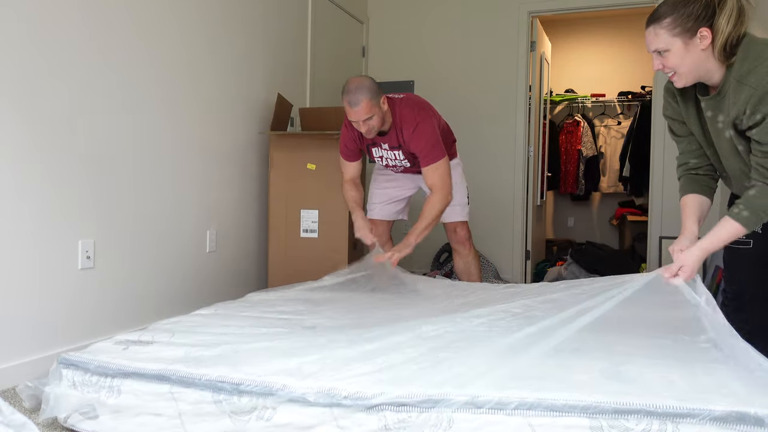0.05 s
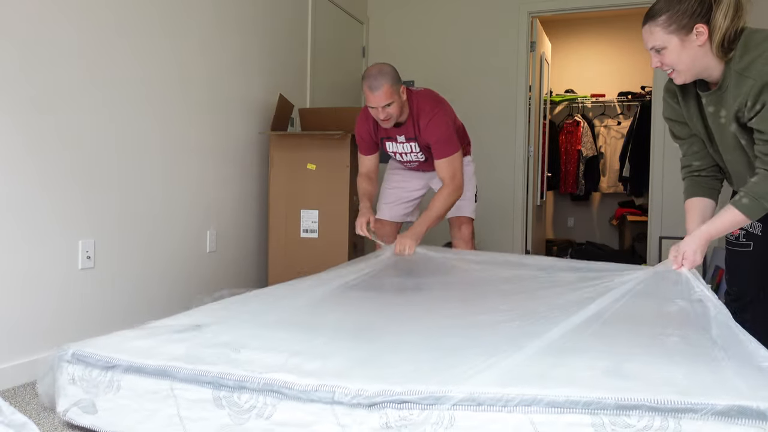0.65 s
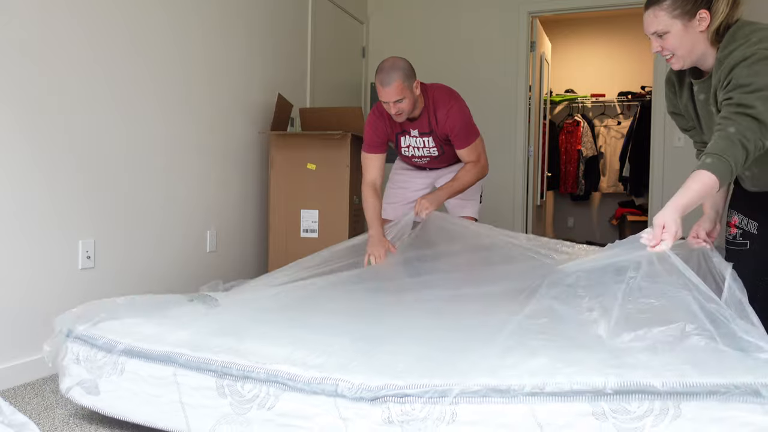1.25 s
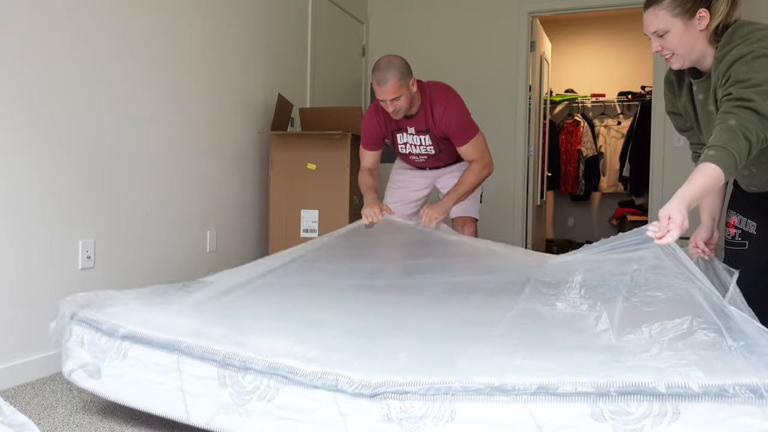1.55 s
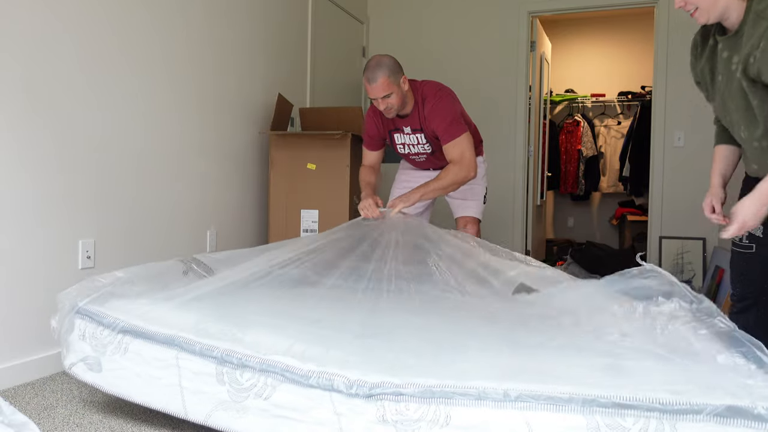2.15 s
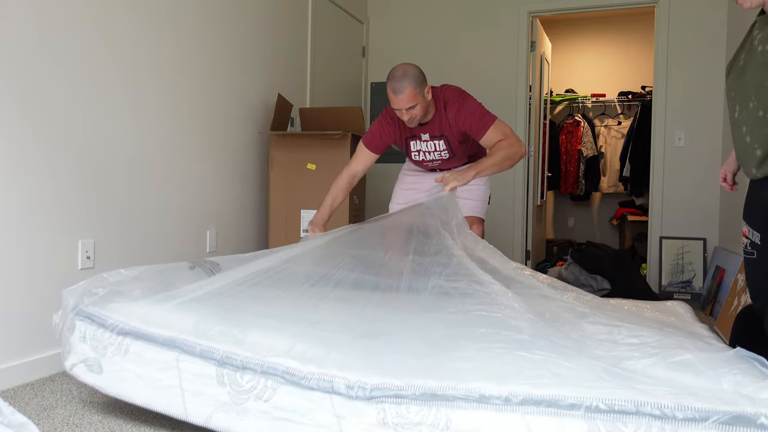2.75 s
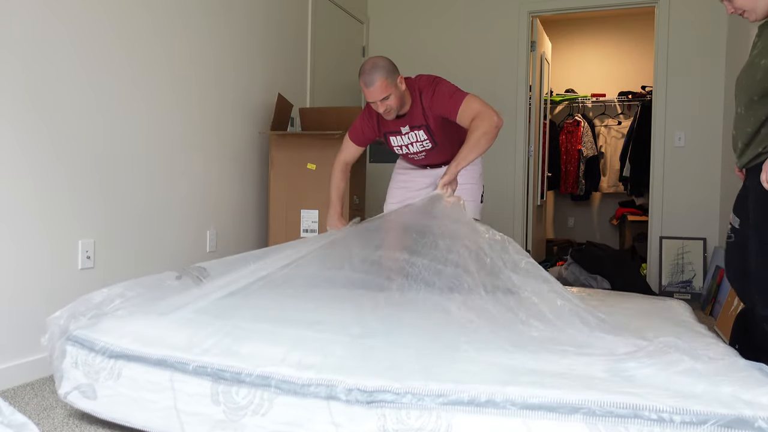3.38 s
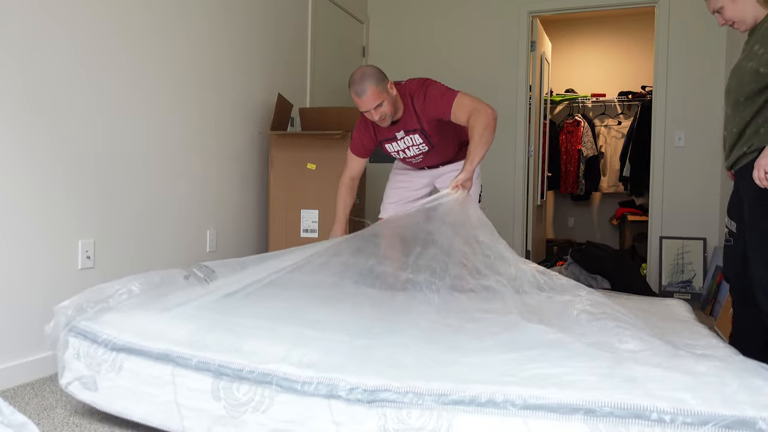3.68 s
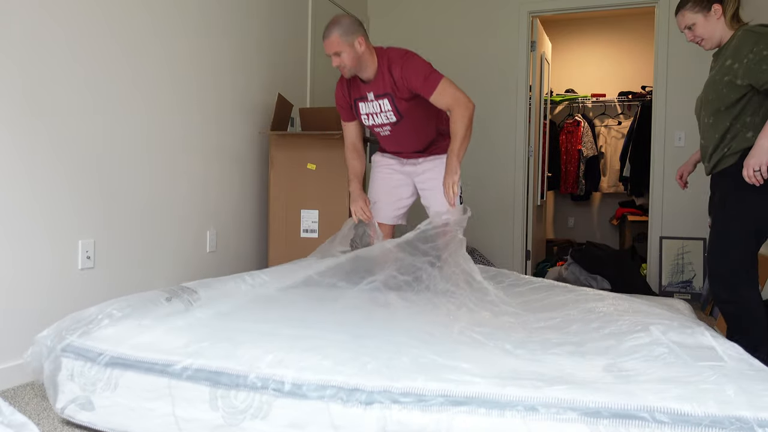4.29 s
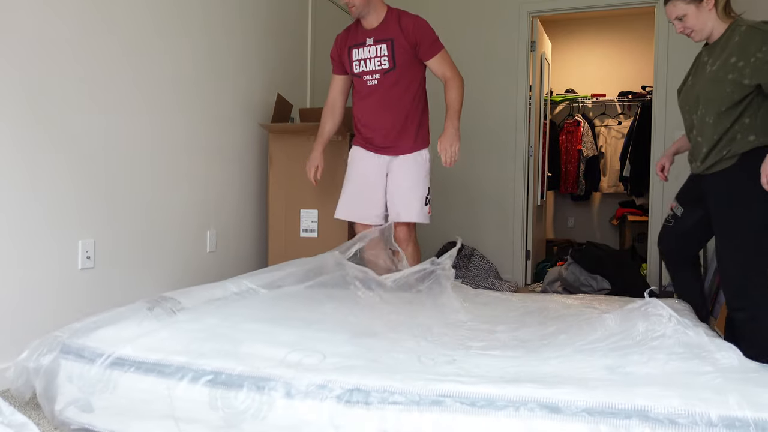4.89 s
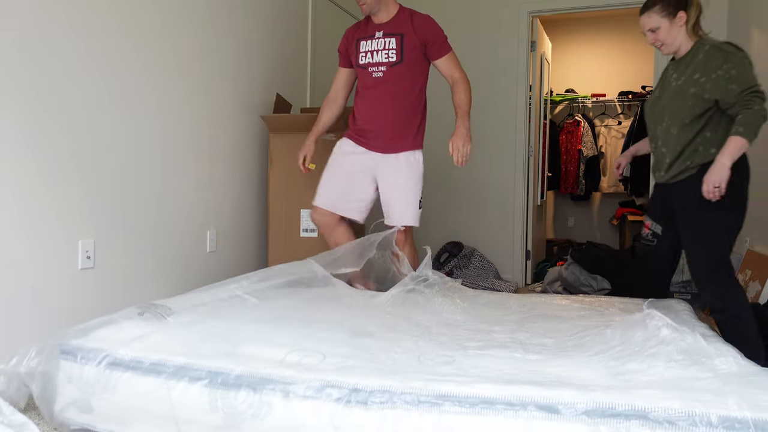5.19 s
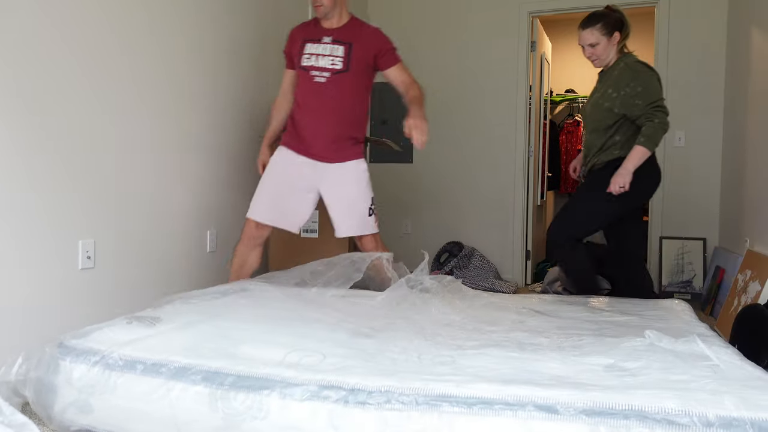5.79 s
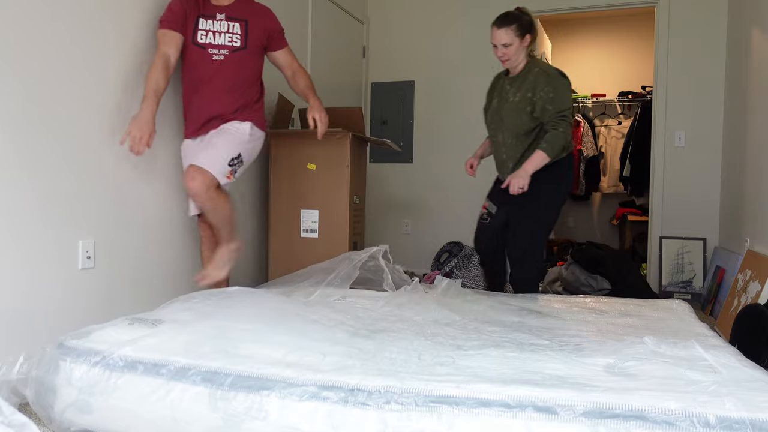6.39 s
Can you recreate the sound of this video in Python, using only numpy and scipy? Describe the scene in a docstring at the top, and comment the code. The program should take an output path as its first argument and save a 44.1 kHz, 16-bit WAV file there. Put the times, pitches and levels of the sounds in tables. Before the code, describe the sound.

Plastic film is tugged off a mattress, crackling and flapping in surges, then settling into lighter rustles and scattered snaps.

```python
"""In a small bedroom, two people pull thin plastic wrapping off a mattress.
With each pull the film speeds up and coasts to rest. Countless creases buckle as it moves, over the
hiss of film sliding on fabric, and wide slack panels rumble. Tugs make the sheet flap taut with a
burst of crackle, billowing panels give soft whumps, and single creases snap as it settles.
One soft footfall thumps near the end. The walls add a short echo, and the room has a faint hush."""
import sys
import numpy as np
from scipy import signal
from scipy.fft import rfft, irfft
from scipy.io import wavfile
from scipy.ndimage import uniform_filter1d

SR = 44100
rng = np.random.default_rng(int(sys.argv[2]) if len(sys.argv) > 2 else 0)


def dump(signal):
    """Clip the signal to [-1, 1] and save it as 16-bit WAV at the path in sys.argv[1]."""
    limited = np.clip(np.atleast_2d(signal).T, -1, 1)
    pcm = np.round(limited * 32767).astype(np.int16)
    wavfile.write(sys.argv[1], SR, pcm)


N = 284004
TIME = np.arange(N) / SR

# Each pull speeds up, holds and coasts to rest. More crispness means more treble.
# start_s, rise_s, hold_s, fade_db_per_s, level_db, crispness, rumble_vs_rustle_db
FILM_PULLS = [(0.108, 0.029, 0.028, 27, -25, -13, -20), (0.245, 0.12, 0.38, 11, -23, -10, -7.5),
              (0.908, 0.045, 0.031, 240, -26, -16, -6), (1.094, 0.0099, 0.054, 90, -23.5, -11.5, -4),
              (1.265, 0.012, 0.03, 65, -29.5, -9.5, -4.5), (1.425, 0.01, 0.092, 41, -25.5, -11, -8),
              (1.71, 0.016, 0.13, 39, -29, -12.5, -7), (1.909, 0.056, 0.055, 180, -23.5, -14.5, -23),
              (2.21, 0.19, 0.023, 69, -24.5, -13, -7.5), (2.53, 0.011, 0.27, 71, -29.5, -12, -23),
              (2.885, 0.016, 0.32, 55, -29.5, -13, -12), (3.10, 0.27, 0.16, 43, -22.5, -11, -10.5),
              (3.80, 0.11, 0.14, 67, -26.5, -12, -13.5), (4.129, 0.011, 0.035, 37, -28, -12.5, -19),
              (4.649, 0.035, 0.031, 104, -30.5, -12, -8), (4.93, 0.031, 0.02, 200, -36.3, -11.5, -11),
              (5.18, 0.038, 0.028, 240, -36.5, -11, -7), (5.697, 0.094, 0.026, 62, -25, -11, -9),
              (6.019, 0.029, 0.029, 143, -31, -10.5, -16)]
# The film keeps stirring between pulls, less once it is let go: time_s, level_db
FILM_STIRRING = [(0, -32.5), (0.1, -34), (1.0, -37), (2.15, -31.5), (3.0, -34.5), (4.5, -40), (5.1, -38.5),
                 (5.45, -43.5), (5.65, -46), (6.44, -47)]
# The sheet is jerked taut; the soft thump at 4.95 s is a footfall.
# start_s, thump_db, slap_db, crackle_db, fade_s
TUGS_AND_FOOTFALL = [(0.015, -37.5, -43.5, -55, 0.12), (0.115, -30, -24.5, -36, 0.025),
                     (0.199, -24.5, -22, -48, 0.035), (0.289, -43.5, -39, -20.5, 0.025),
                     (0.379, -40, -40, -30, 0.021), (0.661, -35, -43.5, -22, 0.05),
                     (0.921, -36, -26, -21.5, 0.056), (0.978, -31, -36, -23, 0.039),
                     (1.096, -28, -25, -26, .014), (1.15, -31, -29, -35, 0.062),
                     (1.276, -43, -32, -21, 0.018), (1.282, -30.5, -26, -34, 0.013),
                     (1.315, -32.5, -38, -23, 0.019), (1.435, -37, -29, -27, 0.034),
                     (1.568, -32.5, -30, -44, 0.027), (1.935, -30.5, -25.5, -35.5, 0.023),
                     (1.957, -28.5, -27.5, -31, 0.043), (2.431, -28, -33.5, -22, 0.011),
                     (2.547, -31, -34, -33, 0.018), (2.6, -34, -45, -36, 0.012),
                     (2.635, -40, -45, -26, 0.022), (2.76, -49, -46, -27, 0.02),
                     (2.814, -37, -48, -26, 0.019), (3.278, -50, -51, -24, 0.046),
                     (3.491, -38, -30.5, -27, 0.035), (4.95, -41.5, -47, -42, 0.063),
                     (5.759, -43, -36.5, -41, 0.11), (6.058, -42, -39.5, -30.5, 0.045)]
# Single creases snap through: start_s, level_db, pitch_hz
CREASE_SNAPS = [(0.1132, -16, 4030), (0.121, -15.5, 1200), (0.134, -15, 4000), (0.1985, -20, 2200),
                (0.296, -21, 8000), (0.914, -12, 3500), (1.0973, -8, 1700), (1.267, -18, 7400),
                (1.274, -15, 9000), (1.278, -15, 2570), (1.399, -21, 7500), (1.9325, -12, 1050),
                (1.954, -12.5, 1800), (2.5535, -19, 8000), (2.5559, -15, 520), (2.825, -18, 3300),
                (3.826, -20, 4500), (4.1465, -18, 3480), (4.438, -35, 7600), (4.549, -33, 2800),
                (5.1227, -28, 4500), (5.229, -27, 7000), (5.262, -22, 3500), (5.3306, -28, 4230),
                (5.566, -35, 6900), (5.5735, -28, 8500), (5.668, -39, 8000), (6.157, -22, 3000),
                (6.182, -24.5, 2800), (6.284, -28.5, 1380), (6.328, -34, 4000), (6.348, -29.5, 4200),
                (6.384, -25.5, 4260)]
# A wide panel billows and the air under it booms: start_s, level_db, pitch_hz, fade_s
PANEL_WHUMPS = [(0.025, -35, 90, .03), (0.113, -46, 58, .02), (0.2, -27, 208, .014),
                (0.96, -46, 58.3, .035), (0.995, -28, 282, .014), (1.275, -43, 56, .04),
                (1.285, -30, 290, .016), (1.947, -27, 120, .018), (1.972, -27, 270, .016),
                (2.546, -22, 235, 0.0092), (2.562, -26, 128, .019), (2.645, -36, 121, 0.024),
                (3.115, -43, 115, .02), (3.3, -42, 85, .04)]

# The tone of each sound, from bass to treble: frequency_hz, level_db
CREASE_TONE = [(150, -23), (400, -8), (700, -6.5), (1000, -6.5), (1300, -3.5), (2200, -2.5), (3600, -2),
               (5000, -4), (6500, -7), (8000, -10), (11000, -16.5), (16000, -26)]  # small creases rustling
PANEL_TONE = [(25, -40), (45, -41), (70, -15), (110, -5), (200, -0.5), (290, 2.5), (370, -4), (500, -3),
              (850, -2.5), (1500, -16.5), (4000, -57)]  # wide panels rumbling
THUMP_TONE = [(30, -42), (60, -41), (110, -11), (185, 1.5), (285, 7), (400, -18), (700, -17.5), (2000, -44)]  # the low thump of a tug or footfall
SLAP_TONE = [(100, -34), (250, -0.5), (480, 4.5), (850, 3), (1700, -6.5), (2600, -14), (8000, -35)]  # the brighter slap that comes with it
HUSH_TONE = [(20, -20), (60, -19), (130, -15), (300, 5), (1000, -4), (4000, -10), (15000, -29)]  # still air in the room
# How long the room's echo takes to fade by 60 dB: frequency_hz, fade_s
ECHO_TIMES = [(100, 0.34), (500, 0.55), (2000, 0.35), (6000, 0.29), (14000, 0.22)]
# How far the sound spreads to left and right: frequency_hz, width_db
STEREO_WIDTH = [(60, -49), (220, -34), (380, -16.5), (650, -14.5), (900, -9.5), (2800, -8.5), (5500, -7.5),
                (10000, -4), (15000, -14.5)]


def film_motion(dulling_per_s=3, stir_crispness=-12.5, stir_rumble_db=-8):
    """Pulls and stirring add up; gives the rustle level, crispness and rumble level over time."""
    stir_db = np.interp(TIME, *np.transpose(FILM_STIRRING))
    power = from_db(stir_db) ** 2
    crisp_sum = power * stir_crispness
    rumble = power * from_db(stir_rumble_db) ** 2
    for start_s, rise_s, hold_s, fade_db_per_s, level_db, crispness, rumble_db in FILM_PULLS:
        age = np.maximum(TIME - start_s, 0)
        coasting_s = np.maximum(age - rise_s - hold_s, 0)
        speed = np.minimum(age / rise_s, 1) * from_db(-fade_db_per_s * coasting_s)
        pull = (speed * from_db(level_db)) ** 2
        power += pull
        # the tight creases go first, so a pull grows duller as it lasts
        crisp_sum += pull * (crispness - dulling_per_s * age)
        rumble += pull * from_db(rumble_db) ** 2
    return 10 * np.log10(power), crisp_sum / power, 10 * np.log10(rumble)


def crease_rustle(level_db, crispness, slide_db=-4, tick_db=-14, gain_db=1.32):
    """Faster motion buckles more creases; each has its own size and so its own pitch range."""
    rate = 4200 * from_db(0.42 * (level_db - level_db.max()))
    edges_hz = np.geomspace(500, 15000, 6)
    creases = random_clicks(rate, spread_db=2.5)
    for band in zip(edges_hz, edges_hz[1:]):
        creases += butter(random_clicks(rate / 2, spread_db=1), band, "band", order=1)
    # the sharpest kinks give sparse, very high ticks
    ticks = from_db(tick_db) * rms_one(butter(random_clicks(rate / 20, spread_db=5), 8000, "high"))
    clumps = rms_one(creases) * from_db(0.96 * drift(90))
    sliding_hiss = from_db(slide_db) * rng.standard_normal(N)
    film = even_level(shape_tone(clumps + ticks + sliding_hiss, CREASE_TONE), window_s=.04)
    # the film catches and slips, so the rustle comes in little surges
    film *= from_db(0.71 * drift(32))
    # tight, small creases add treble; a crispness of -12 leaves the tone as it is
    dull = butter(film, 7000, "low", order=1)
    treble = (film - dull) * from_db(4 * (crispness + 12))
    return (dull + treble) * from_db(level_db + gain_db)


def panel_rumble(level_db, gain_db=-3.5, flutter_db=0.5):
    """Wide slack areas of film flip over with low, papery pops."""
    pops = shape_tone(random_clicks(1100, spread_db=2.6), PANEL_TONE)
    return even_level(pops, window_s=.06) * from_db(level_db + gain_db + flutter_db * drift(30))


def tugs_and_footfall(gains_db=(2, 2, 1)):
    """A tugged sheet shoves the air, slaps and crackles; the same layers make one soft footfall."""
    layers = np.array([even_level(shape_tone(random_clicks(3000, spread_db=2), tone), window_s=.01)
                       for tone in (THUMP_TONE, SLAP_TONE, CREASE_TONE)])
    out = np.zeros(N)
    for start_s, *levels_db, fade_s in TUGS_AND_FOOTFALL:
        part = slice(int(start_s * SR), int((start_s + .5) * SR))
        age = np.arange(len(out[part])) / SR
        swell = (1 - np.exp(-age / .003)) * np.exp(-(age / fade_s) ** 2)
        blend = from_db(np.add(levels_db, gains_db)) @ layers[:, part]
        out[part] += swell * blend
    return out


def crease_snaps(pulse_strength=12, gain_db=3, top_hz=11500):
    """A stiff crease gives way and chatters briefly; the hardest ones start with a sharp pulse."""
    out = np.zeros(N)
    age = np.arange(SR // 50) / SR
    for start_s, level_db, pitch_hz in CREASE_SNAPS:
        peak = from_db(level_db + gain_db)
        force = rng.standard_normal(len(age)) * np.exp(-age / .0025)
        force[0] -= pulse_strength * peak
        crack = butter(force, [pitch_hz / 1.6, pitch_hz * 1.6], "band", order=1)
        crack = butter(crack, pitch_hz * 3, "low", order=1)
        crack = butter(crack, top_hz, "low", order=3)
        start = int(start_s * SR)
        out[start:start + len(age)] += (peak * crack / np.abs(crack).max())[:N - start]
    return out


def panel_whumps(swell_s=0.0029):
    """The cushion of air under a falling panel swings back and forth a few times, softly."""
    out = np.zeros(N)
    for start_s, level_db, pitch_hz, fade_s in PANEL_WHUMPS:
        age = np.maximum(TIME - start_s, 0)
        swell = 1 - np.exp(-(age / swell_s) ** 2)
        fade = np.exp(-np.minimum(age / fade_s, 20))
        swing = swell * fade * np.sin(2 * np.pi * pitch_hz * age)
        out += from_db(level_db) * swing / np.abs(swing).max()
    return out


def bedroom_echo(sound, build_up_s=0.0026, places=7):
    """The sheet is wide and keeps moving, so its sound reaches the walls from ever changing places."""
    age = np.arange(int(.3 * SR)) / SR
    edges_hz = np.geomspace(30, 19000, 8)
    tails = np.zeros((places, len(age)))  # one echo for each place; the treble dies first
    for low, high in zip(edges_hz, edges_hz[1:]):
        noise = butter(rng.standard_normal(tails.shape), [low, high], "band")
        tails += noise * from_db(-60 * age / at_hz(ECHO_TIMES, np.sqrt(low * high)))
    tails *= 1 - np.exp(-(age / build_up_s) ** 2)
    tails /= np.linalg.norm(tails, axis=1, keepdims=True)
    shares = np.array([drift(90) for _ in tails])
    shares /= np.linalg.norm(shares, axis=0)
    return sum(signal.oaconvolve(sound * share, tail)[:N] for share, tail in zip(shares, tails))


def room_hush(level_db=-56):
    """The faint hush of still air in the room."""
    return from_db(level_db) * rms_one(shape_tone(rng.standard_normal(N), HUSH_TONE))


def random_clicks(per_s, spread_db):
    """Clicks like buckling creases, many small and a few large; equally strong overall at any rate."""
    chance = np.clip(per_s / SR * np.ones(N), 1e-4, 1)
    draw, size, sign = rng.random((3, N))
    hits = draw < chance
    size_db = spread_db * np.minimum(-np.log(size[hits]), 4.2)
    clicks = np.zeros(N)
    clicks[hits] = np.sign(sign[hits] - .5) * from_db(size_db) / np.sqrt(chance[hits])
    return rms_one(clicks)


def drift(per_s):
    """A wandering curve that glides to a new random value per_s times a second."""
    points = rng.standard_normal(4096)
    return rms_one(np.interp(TIME * per_s, np.arange(len(points)), points))


def shape_tone(x, tone, size=8192):
    """Filter a sound to follow a tone table."""
    gains = from_db(at_hz(tone, np.arange(size // 2 + 1) * SR / size))
    cepstrum = irfft(np.log(gains))
    # fold it so the filter rings only after a click, never before (minimum phase)
    cepstrum[1:size // 2] *= 2
    cepstrum[size // 2 + 1:] = 0
    return signal.oaconvolve(x, irfft(np.exp(rfft(cepstrum))))[:N]


def butter(x, hz, kind, order=2):
    """Keep only the lows, the highs or a band between."""
    sections = signal.butter(order, np.clip(hz, 10, .45 * SR), kind, fs=SR, output="sos")
    return signal.sosfilt(sections, x + 1e-18)


def at_hz(table, hz):
    """Read between a table's rows, giving every octave equal room."""
    row_hz, values = np.transpose(table)
    return np.interp(np.log(np.maximum(hz, 1)), np.log(row_hz), values)


def even_level(x, window_s):
    """Hold the level steady while keeping the fine crackle."""
    power = uniform_filter1d(x ** 2, int(window_s * SR))
    return x / np.sqrt(np.maximum(power, 0) + 1e-12)


def rms_one(x):
    """Scale to an average level (rms) of 1."""
    return x / np.sqrt(np.mean(x ** 2) + 1e-20)


def from_db(db):
    """Turn decibels into a multiplier."""
    return 10 ** (np.asarray(db) / 20)


def scene(echo_db=-6, hush_side_db=5, balance=-0.12):
    """The film lies ahead, its creases scattered to left and right; the walls answer from all round."""
    rustle_db, crispness, rumble_db = film_motion()
    direct = crease_rustle(rustle_db, crispness) + panel_rumble(rumble_db)
    direct += tugs_and_footfall() + crease_snaps() + panel_whumps()
    echo = from_db(echo_db)
    direct /= np.sqrt(1 + echo ** 2)
    position = rms_one(np.tanh(2 * drift(500))) + balance  # above 0 is left, below 0 is right
    middle = direct + echo * bedroom_echo(direct) + room_hush()
    side = direct * position + echo * bedroom_echo(direct) + from_db(hush_side_db) * room_hush()
    side = shape_tone(side, STEREO_WIDTH)  # long bass waves reach left and right alike
    return np.array([middle + side, middle - side])


def record(dry, low_cut_hz=56, high_cut_hz=15900):
    """The microphone loses the deep bass; the highest treble is cut steeply."""
    thinned = butter(dry, low_cut_hz, "high")
    return signal.sosfilt(signal.ellip(12, .1, 90, high_cut_hz, fs=SR, output="sos"), thinned)


dry = scene()
out = record(dry)
dump(out)
```